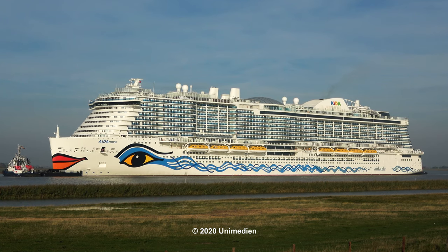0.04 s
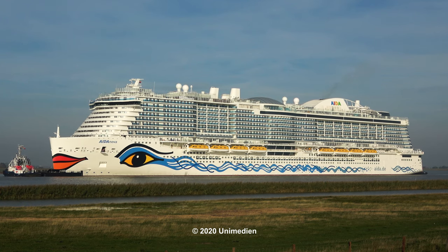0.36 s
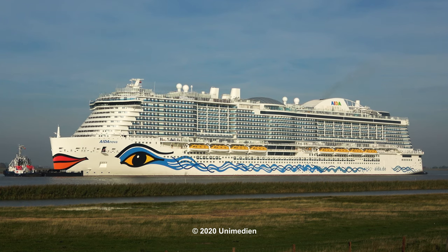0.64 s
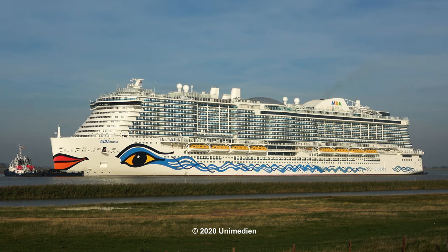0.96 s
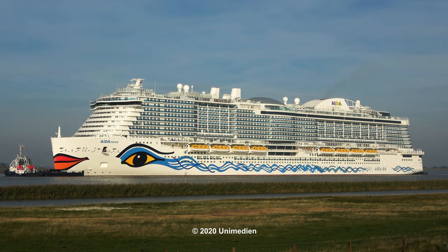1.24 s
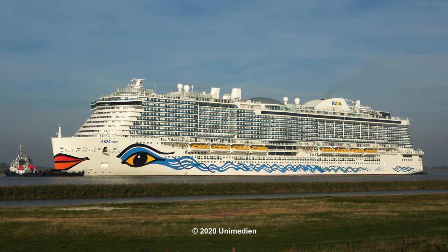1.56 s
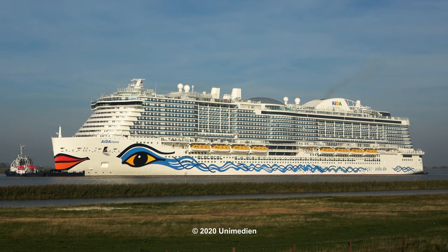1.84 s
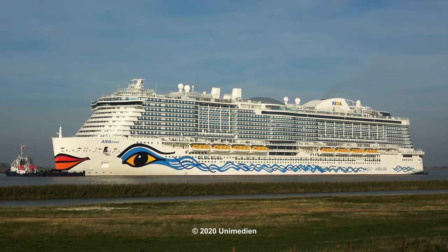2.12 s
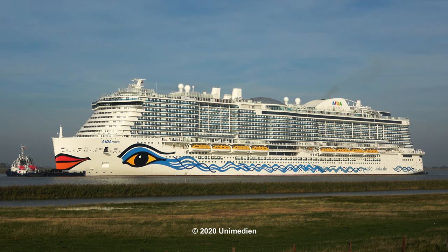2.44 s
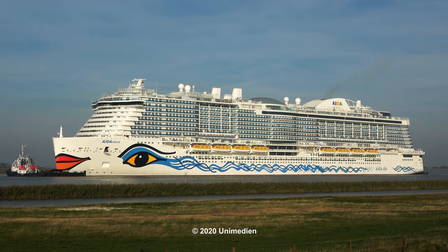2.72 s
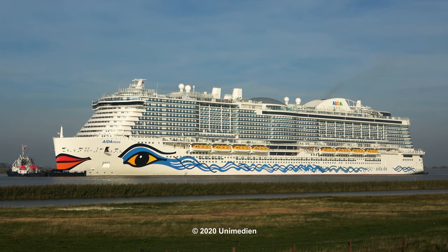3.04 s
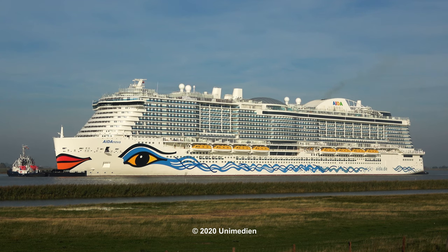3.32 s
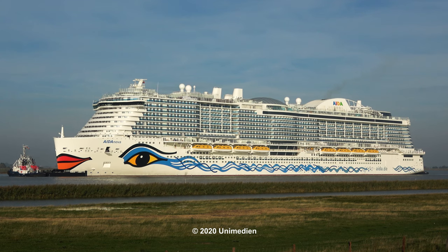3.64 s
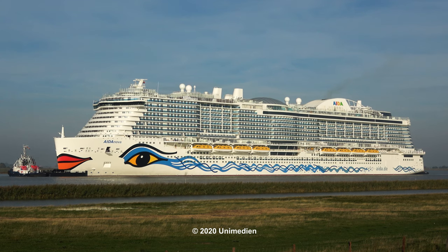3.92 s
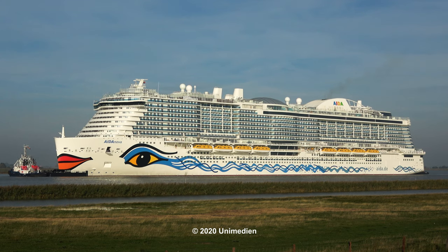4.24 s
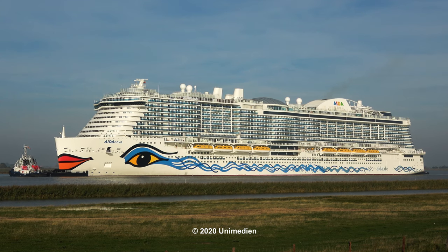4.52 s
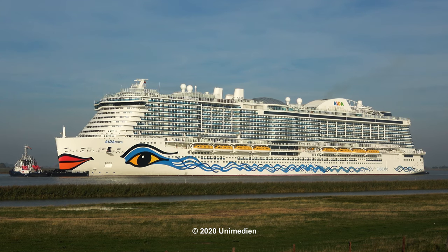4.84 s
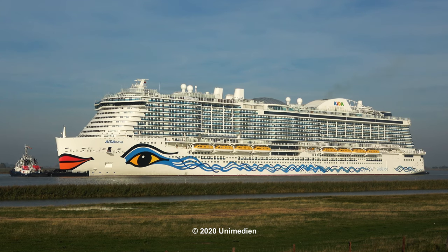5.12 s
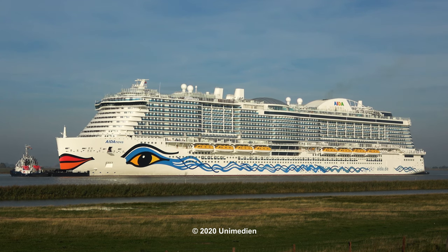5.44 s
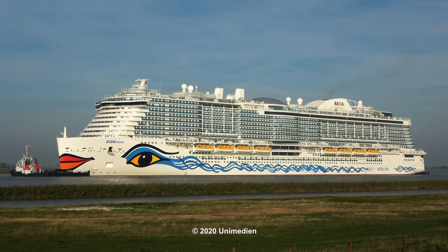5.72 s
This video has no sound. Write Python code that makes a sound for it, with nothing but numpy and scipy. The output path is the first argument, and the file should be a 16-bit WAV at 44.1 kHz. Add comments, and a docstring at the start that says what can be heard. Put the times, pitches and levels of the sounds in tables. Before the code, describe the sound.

Far ship engines throb deeply across a windy meadow, their hum and fan roar sinking slowly after one rumbling gust.

```python
"""A riverside meadow, a few hundred metres from a tug that leads a cruise ship.
Two diesel exhausts drone and, running at slightly different speeds, throb over a low rumble and the
roar of fans and machinery. The wind carries the sound in swells and lets it fade; one gust passes.
Grass hisses, a thin whine flares and sinks, and far birds call softly.
Behind it all lie a faint, wide, high hiss and a faint electric buzz."""
import sys
import numpy as np
from scipy import signal
from scipy.fft import rfft, irfft
from scipy.io import wavfile

SR = 44100
rng = np.random.default_rng(int(sys.argv[2]) if len(sys.argv) > 2 else 0)


def log_audio(samples):
    """Write samples as a 16-bit WAV file to the path given in sys.argv[1]."""
    # one column per channel
    frames = np.atleast_2d(samples).T
    # limit to full scale, then quantise
    limited = np.clip(frames, -1, 1)
    pcm = np.round(limited * 32767).astype(np.int16)
    wavfile.write(sys.argv[1], SR, pcm)


N = 254456
T = np.arange(N) / SR
FREQS = np.fft.rfftfreq(N, 1 / SR)
SIDEWAYS = np.array([[1], [-1]])  # opposite in left and right, so a sound seems wide


def diesel_drone(drone_db, roar_db, main_hz=119.15, second_hz=113.0, in_step_s=.26):
    """Two diesels' firing tones fall in step six times a second; a weak echo comes from the side."""
    turn = 2 * np.pi * (T - in_step_s)
    main = unit(np.cos(main_hz * turn + .13 * wander(3))) * undb(.7 * wander(7))
    second = unit(np.cos(second_hz * turn + .13 * wander(2)))
    echo = undb(-27) * narrow_noise(main_hz, 5) * SIDEWAYS
    return (main + echo) * undb(drone_db) + second * undb(roar_db + 4)


def slow_beat(period_s=2.01, peak_s=.33, depth=.51):
    """Level in dB of two nearly equal tones drifting in and out of step: round tops, short dips."""
    angle = 2 * np.pi * (T - peak_s) / period_s
    return 20 * np.log10(np.abs(1 + depth * np.exp(1j * angle)))


def funnels(roar_db):
    """Gas rushes out of the funnels, with weaker exhaust tones around the drone."""
    # exhaust tones: f/Hz, level/dB against the roar, depth of fading/0-1
    exhaust_tones = [(109.9, -3.5, 1), (138.6, 0, 0.6), (147.6, 1, 0.9), (172.8, -22, 1)]
    # tone colour of the rushing gas: f/Hz, relative level/dB
    gas_colour = [(70, -17.5), (95, -9), (115, 2.5), (145, -2.5), (185, -4), (230, -21.5), (400, -52.5)]
    tones = sum(undb(db) * engine_tone(hz, fading, fade_rate=1) for hz, db, fading in exhaust_tones)
    gas = turbulent(gas_colour, flicker_db=-1.7, flicker_rate=8.7)
    return (tones + undb(4) * gas) * undb(roar_db)


def rumble(rumble_db):
    """Deep engine tones lie in wind and propeller rumble; swirls of air differ between left and right."""
    # deep tones of the turning engines: f/Hz, level/dB against the rumble, depth of fading/0-1
    deep_tones = [(38.66, -4, 0.9), (41.94, -10.5, 0), (50.4, -4.5, 0.8), (54.13, -12, 1),
                  (56.05, -10, 0.6), (78.9, -14.5, 0.9)]
    # tone colour of wind and propellers: f/Hz, relative level/dB
    rumble_colour = [(12, -28), (24, -8.5), (38, -1.5), (55, -0.5), (70, -3.5), (92, -6.5), (130, -23.5)]
    tones = sum(undb(db) * engine_tone(hz, fading, fade_rate=2.55) for hz, db, fading in deep_tones)
    noise = turbulent(rumble_colour, flicker_db=-1.6, flicker_rate=4)
    swirls = turbulent(rumble_colour, flicker_db=.5, flicker_rate=2.8) * SIDEWAYS
    return (tones + undb(-1) * noise + undb(-23) * swirls) * undb(rumble_db)


def engine_tone(hz, fading, fade_rate):
    """A steady tone plus its drifting echo off water and banks, which strengthens or weakens it."""
    tone = np.exp(2j * np.pi * (hz * T + rng.random()))
    echo = fading * (wander(fade_rate) + 1j * wander(fade_rate))  # drifts in strength and timing
    return unit(np.real(tone * (1 + echo)))


def machinery(roar_db):
    """Fans and engine rooms roar and hum a little to the left, dulled by distance."""
    # fan and duct tones: f/Hz, width/Hz, level/dB against the roar
    fan_tones = [(207.5, 9.2, -9.5), (233.3, 1.1, -18.5), (264.5, 6.5, -10.5), (360.3, 4.5, -16),
                 (414.3, 2.1, -20), (483, 13, -12.5), (528.7, 12, -11), (623, 22, -11.5), (957, 55, -16),
                 (1570, 6.3, -36.5), (1973, 28, -31)]
    # tone colour of the roar: f/Hz, relative level/dB
    roar_colour = [(100, 6.5), (230, -4.5), (320, 0.5), (390, -0.5), (520, 2), (700, -0.5), (950, -5),
                   (1300, -10), (1900, -16), (2200, -21.5), (3400, -32.5), (3900, -40.5), (6000, -52.5)]
    tones = sum(undb(db) * narrow_noise(hz, width) for hz, width, db in fan_tones)
    roar = turbulent(roar_colour, flicker_db=.6, flicker_rate=5)
    scattered = turbulent(roar_colour, flicker_db=.6, flicker_rate=5) * SIDEWAYS
    return (pan(roar + tones, left_db=2) + undb(-23) * scattered) * undb(roar_db)


def whine(roar_db, pitch_hz=2380, wobble_hz=7, flutter_db=2.5):
    """A thin machine note flutters in the moving air, flares briefly and sinks as the wind drops."""
    carried_db = -63 + .61 * (roar_db - roar_db.max())
    flare_db = 5 * bump(centre_s=1.98, width_s=.36)
    drop_db = -6.5 * rise(start_s=2.23, length_s=.18)
    phase = 2 * np.pi * np.cumsum(pitch_hz + wobble_hz * wander(24.5)) / SR
    note = unit(np.sin(phase) * undb(flutter_db * wander(26)))
    blur = undb(-5) * narrow_noise(pitch_hz, 30)
    return unit(note + blur) * undb(carried_db + flare_db + drop_db)


def grass(hiss_db):
    """Wind hisses in grass and reeds; the stems rustle only near the top of a gust."""
    # tone colour of the grass: f/Hz, relative level/dB
    grass_colour = [(800, -17.5), (2400, 12), (3300, 10), (4000, 5.5), (5500, 1), (7500, -2.5),
                    (10000, -3.5), (15500, -5)]
    hiss = turbulent(grass_colour, flicker_db=.2, flicker_rate=8)
    rustle_db = -7 + 3 * (hiss_db - hiss_db.max())
    rustle = narrow_noise(4800, 1500) * undb(rustle_db)
    return (hiss + rustle) * undb(hiss_db)


def birds(blur_hz=70):
    """Far birds pipe soft notes, blurred by the long way over the marsh."""
    # bird calls: start t/s, length/s, f/Hz, level/dB
    calls = [(2.2, 0.75, 3210, -67.5), (2.48, 0.39, 2610, -65), (2.72, 0.21, 2130, -68),
             (3.05, 0.57, 2950, -71), (3.348, 0.38, 3430, -70), (3.775, .14, 3500, -75),
             (4.3, 0.31, 2220, -69), (4.56, .42, 3120, -68), (5.1, .45, 3300, -71)]
    out = np.zeros(N)
    for start, length, hz, db in calls:
        swell = np.sin(np.pi * rise(start, length))
        out += undb(db) * swell * narrow_noise(hz, blur_hz)
    return out


def high_hiss(hiss_db):
    """A faint, wide, high hiss, strongest from 6 to 11 kHz."""
    # tone colour of the high hiss: f/Hz, relative level/dB
    high_colour = [(2000, -8.5), (4200, -19.5), (5800, 12), (8000, 10), (11200, 6), (13000, -18),
                   (15500, -16)]
    return turbulent(high_colour, flicker_db=.2, flicker_rate=8) * SIDEWAYS * undb(hiss_db - 12)


def electric_buzz(mains_hz=50):
    """Mains electricity buzzes faintly: high multiples of its frequency, in two tight clusters."""
    # clusters of tones: centre f/Hz, width/Hz, level/dB of the strongest tone
    clusters = [(4050, 100, -87), (5000, 55, -91)]
    out = np.zeros(N)
    for centre, width, db in clusters:
        for multiple in round(centre / mains_hz) + np.arange(-4, 5):
            hz = multiple * mains_hz
            gain = undb(db) * np.exp(-((hz - centre) / width) ** 2 / 2)
            out += gain * unit(np.sin(2 * np.pi * (hz * T + rng.random())))
    return out


def turbulent(colour, flicker_db, flicker_rate):
    """Noise of a given tone colour, in which each octave wavers on its own."""
    hz, db = np.transpose(colour)
    octave = np.log2(np.maximum(FREQS, 1))
    roll_off = np.minimum(FREQS / hz[0], 1) * np.minimum(hz[-1] / 2 ** octave, 1) ** 2
    spectrum = rfft(rng.standard_normal(N)) * undb(np.interp(octave, np.log2(hz), db)) * roll_off
    out = 0
    for centre in range(3, 15):
        band = irfft(spectrum * np.maximum(1 - np.abs(octave - centre), 0), N)
        out = out + band * undb(flicker_db * wander(flicker_rate))
    return unit(out)


def narrow_noise(hz, width_hz):
    """A tone smeared into a band of noise by swirling air."""
    spectrum = rfft(rng.standard_normal(N))
    return unit(irfft(spectrum / (1 + ((FREQS - hz) / width_hz) ** 2), N))


def wander(rate):
    """A smooth random curve of typical size 1 that changes about rate times a second."""
    spectrum = rfft(rng.standard_normal(N))
    return unit(irfft(spectrum * np.exp(-(FREQS / rate) ** 2), N))


def bump(centre_s, width_s):
    """A smooth rise to 1 and fall back."""
    return np.exp(-((T - centre_s) / width_s) ** 2)


def rise(start_s, length_s):
    """A straight ramp from 0 to 1."""
    return np.clip((T - start_s) / length_s, 0, 1)


def pan(x, left_db):
    """Make a sound left_db louder on the left than on the right."""
    return x * undb(SIDEWAYS * left_db / 2)


def undb(db):
    """Turn decibels into a factor to multiply by."""
    return 10 ** (np.asarray(db) / 20)


def unit(x):
    """Scale a signal to an average strength (rms) of 1."""
    return x / np.sqrt(np.mean(np.abs(x) ** 2))


def scene():
    """Ships far across the meadow; all but the birds and the buzz swell and fade together."""
    # how well the wind carries the ships' sound: t/s, level/dB of the roar
    wind_carry = [(0.0, -35.5), (0.9, -40), (1.65, -36.5), (2.48, -38), (3.17, -43.5), (4.85, -45),
                  (5.77, -46.5)]
    roar_db = np.interp(T, *np.transpose(wind_carry))
    swing_db = roar_db - roar_db.mean()
    # in one gust the grass swells, the drone sinks a little, and the rumble jumps and dies away
    gust = bump(centre_s=1.66, width_s=.55)
    jump_s, decay_s = 1.42, .78
    jump = rise(jump_s, length_s=.087) * np.exp(-np.maximum(T - jump_s, 0) / decay_s)
    drone_db = roar_db + 12 + slow_beat() - 2 * gust
    rumble_db = -34.5 + .66 * swing_db + 5.5 * jump
    hiss_db = -62.5 + .76 * swing_db + 1.5 * gust
    engines = diesel_drone(drone_db, roar_db) + funnels(roar_db) + rumble(rumble_db)
    ships = engines + machinery(roar_db) + whine(roar_db)
    return ships + birds() + grass(hiss_db) + high_hiss(hiss_db) + electric_buzz()


def record(dry, fade_s=.004, top_hz=15700):
    """Fade both ends so they do not click, and cut the highest treble."""
    fade = np.minimum(np.minimum(T, T[-1] - T) / fade_s, 1)
    low_pass = signal.ellip(10, .1, 70, top_hz, fs=SR, output="sos")
    return signal.sosfilt(low_pass, dry * fade)


dry = scene()
out = record(dry)
log_audio(out)
```